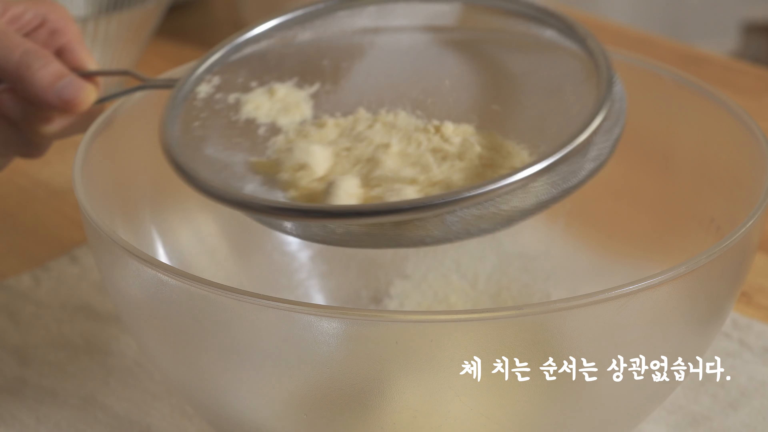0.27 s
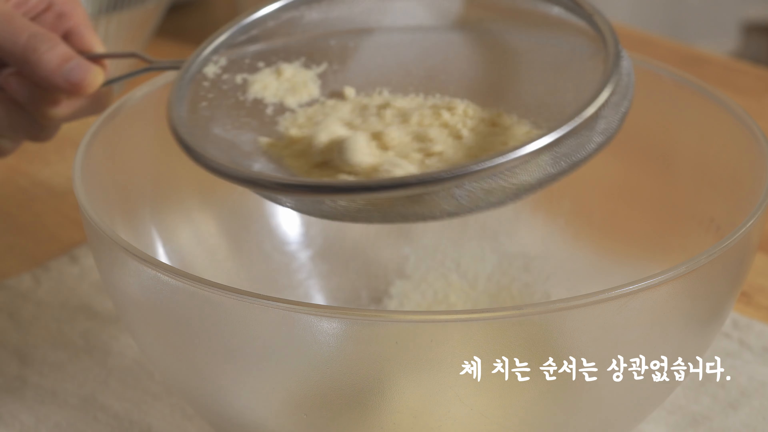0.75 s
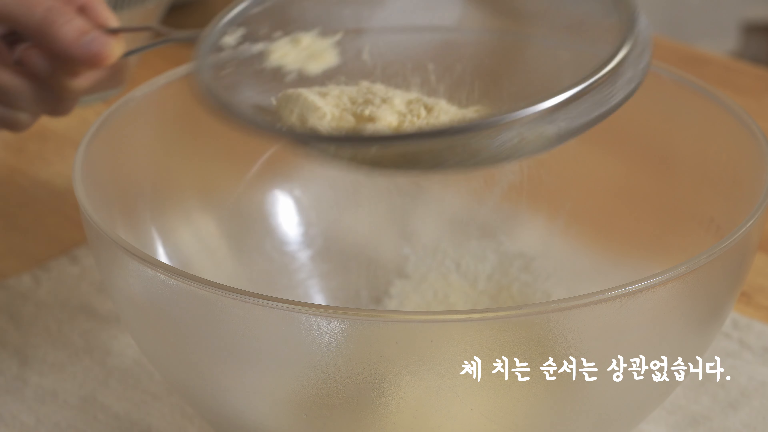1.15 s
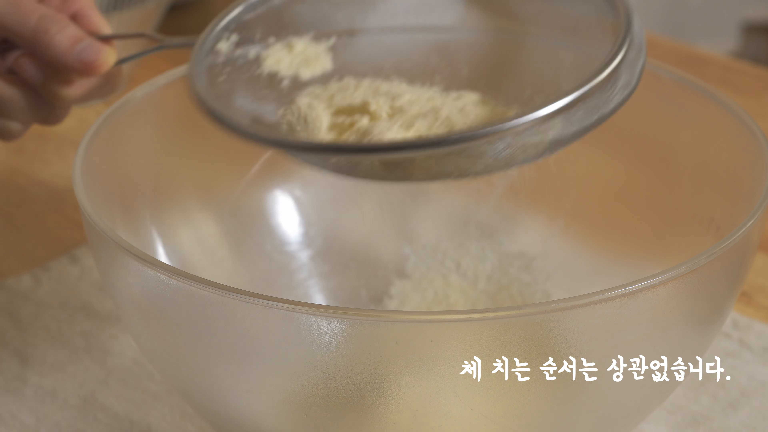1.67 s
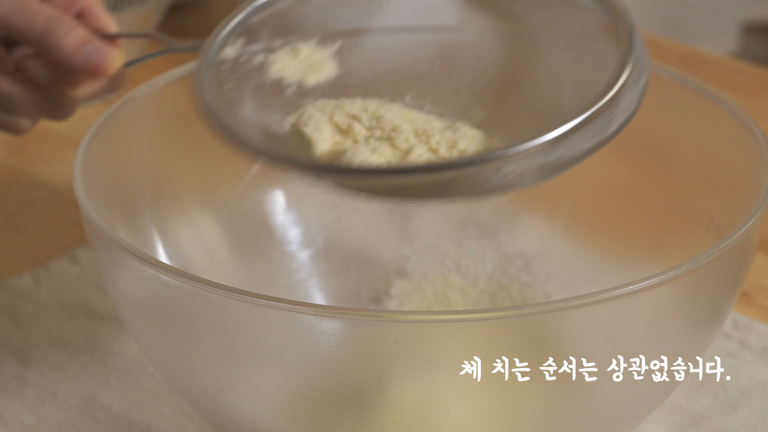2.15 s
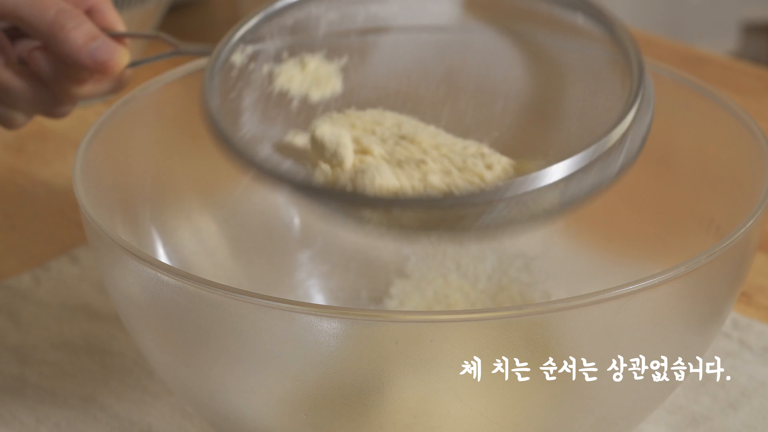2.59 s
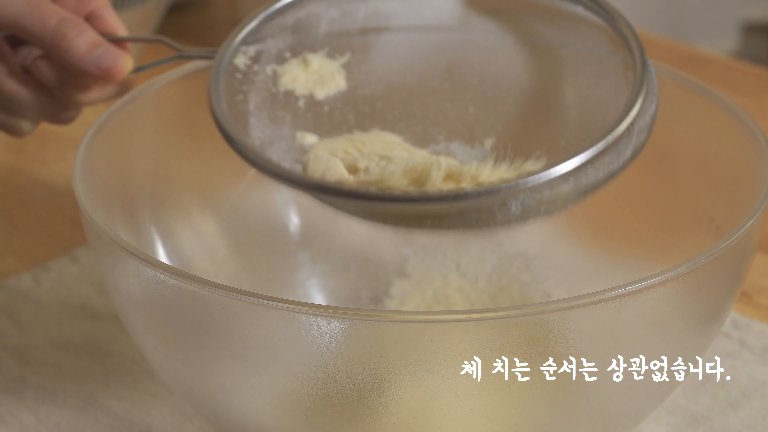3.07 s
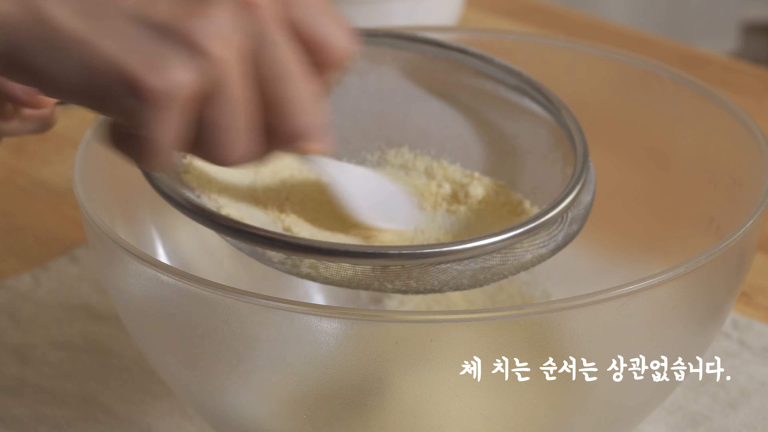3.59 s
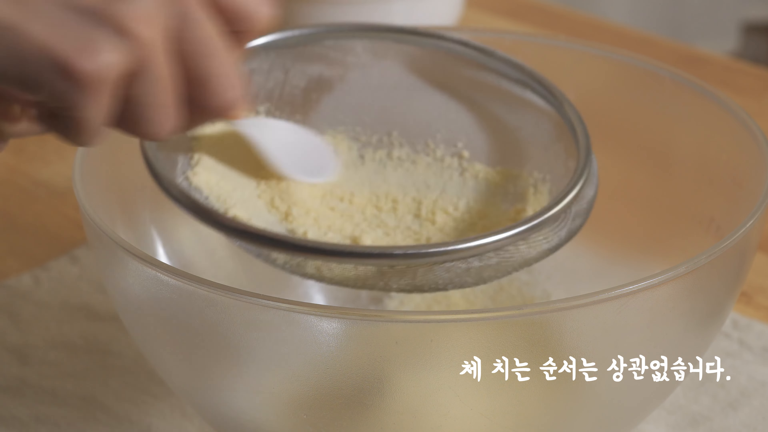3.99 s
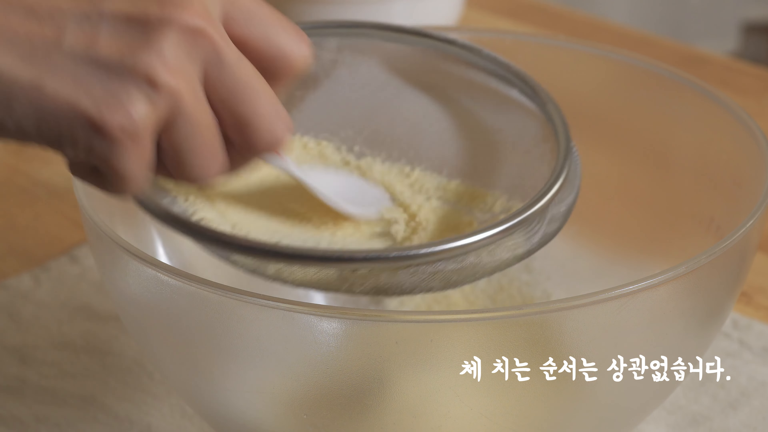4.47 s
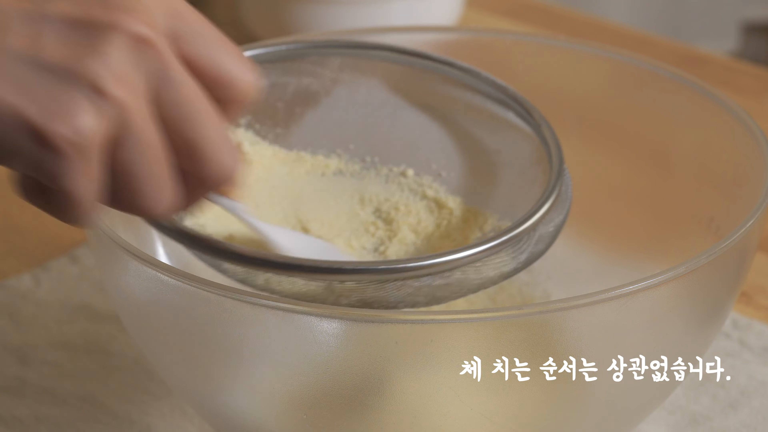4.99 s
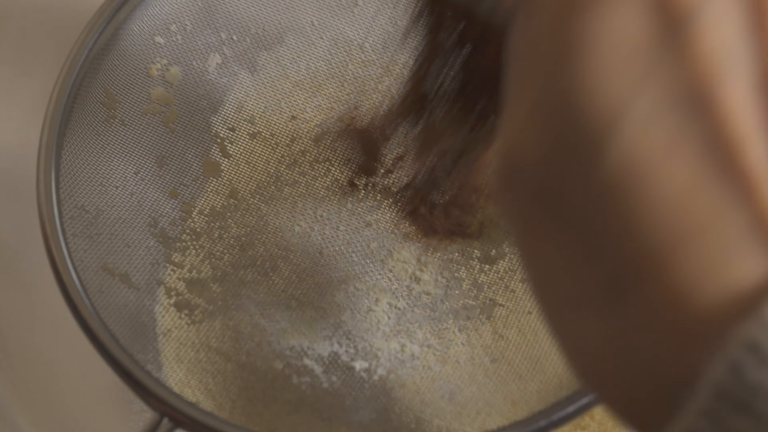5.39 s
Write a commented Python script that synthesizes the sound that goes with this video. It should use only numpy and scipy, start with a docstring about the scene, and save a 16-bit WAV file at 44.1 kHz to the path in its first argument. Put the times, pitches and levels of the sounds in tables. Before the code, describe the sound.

Flour hisses back and forth in a shaken wire sieve, then a spoon rubs it through with hollow scraping and a few knocks.

```python
"""A wire sieve of nut flour is shaken over a glass bowl: the heap hisses to and fro across the mesh and lumps
tick as they break on the wires. Then a spoon rubs the flour through: catching grains make the bowl's hollow
drone, the frame rasp and the table rumble, while fine grit hisses and now and then snaps. Soft pushes bump in
the hollow and knocks ring the frame. A quiet kitchen with an appliance hum lies below."""
import sys
import numpy as np
from scipy import signal
from scipy.fft import rfft, irfft, next_fast_len
from scipy.io import wavfile

SR = 44100
rng = np.random.default_rng(int(sys.argv[2]) if len(sys.argv) > 2 else 0)


def file_out(sig):
    """Save sig as 16-bit WAV at sys.argv[1]."""
    # one column per channel
    cols = np.atleast_2d(sig).T
    # limit, then scale
    lim = np.clip(cols, -1, 1)
    pcm = np.round(lim * 32767).astype(np.int16)
    wavfile.write(sys.argv[1], SR, pcm)


N = 248724
T = np.arange(N) / SR
SPOON_STARTS_S = 3.283   # shaking ends, rubbing begins

HEAP_SLIDES = [(.014, -64), (.056, -48.5), (.150, -53), (.206, -52.5), (.292, -55.5), (.351, -51.5),
               (.443, -54), (.504, -51), (.598, -53), (.675, -49), (.764, -56), (.849, -52), (.941, -57),
               (1.030, -51), (1.124, -57.5), (1.204, -50.5), (1.306, -55), (1.391, -50.5), (1.482, -55.5),
               (1.564, -50.5), (1.666, -55), (1.745, -51), (1.844, -56), (1.918, -51), (2.002, -55),
               (2.065, -50), (2.153, -53.5), (2.224, -49), (2.311, -54.5), (2.379, -53), (2.458, -58),
               (2.525, -51.5), (2.609, -55), (2.678, -50.5), (2.766, -53.5), (2.846, -50), (2.934, -55),
               (3.018, -51), (3.109, -56.5), (3.198, -50.5)]   # each slide at its fastest: t/s, level/dB
SWING_SHAPES = [(0.016, 0.02), (0.014, 0.027)]   # light swing, firm swing, timed to 4 dB below the top: rise/s, fall/s
HISS_EQ = [(880, -16.5), (1500, -12), (2390, -38), (2640, -9.5), (2860, -14), (3960, -10), (5020, -8.5),
           (6700, 2.5), (7200, 1), (7700, 2.5), (10200, 4.5), (12700, -2), (16000, -3)]   # flour on wire mesh: f/Hz, level/dB
def sliding_flour(trickle_db=-61.5):
    """The heap hisses over the mesh in light and firm swings, stopping short as the hand turns."""
    power = np.full(N, amp(trickle_db) ** 2)   # flour keeps falling between slides
    for k, (s, db) in enumerate(HEAP_SLIDES):
        rise_s, fall_s = SWING_SHAPES[k % 2]
        near = slice(max(int((s - .12) * SR), 0), int((s + .12) * SR))
        late = T[near] - s
        slowing = np.where(late < 0, np.abs(late / rise_s) ** 1.65, np.abs(late / fall_s) ** 3.5)
        power[near] += amp(db - 4 * slowing) ** 2
    dust = grains(per_s=15000, spread_db=1.2, shared=.65)
    return (T < SPOON_STARTS_S) * np.sqrt(power) * flutter(60, 1.0) * colour(dust, HISS_EQ)


FLOUR_TICKS = [(.009, -33, 1.5), (.0868, -50, 4), (0.1595, -40.5, 2), (0.215, -39.5, 5), (0.3164, -41, 1.5),
               (0.3264, -45, -7), (0.3908, -47.5, 5), (0.4615, -41.5, 4), (.4717, -42, -9),
               (0.5405, -48.5, 3), (0.6245, -45, 2), (0.63, -42, -4), (.706, -48.5, 4), (0.796, -43.5, 3),
               (0.855, -45, 2.5), (.9766, -46.5, 0.5), (.9942, -45.5, -4), (1.158, -42.5, 0.5),
               (1.1688, -48, -8), (1.3907, -41.5, 2), (1.5078, -39.5, 3), (1.5255, -45.5, -10),
               (1.6933, -40, 0.5), (1.706, -43, -4), (1.773, -53, 8), (1.8186, -59, 14.5), (1.8695, -41, 3),
               (1.881, -40, -3), (1.9518, -50.5, 7), (2.0216, -40, 3), (2.03, -42.5, -4),
               (2.1, -48.5, 10.5), (2.1321, -56.5, 15.5), (2.179, -33.5, 1), (2.2559, -49.5, 6),
               (2.329, -41, 2.5), (2.3852, -39.5, 4), (2.485, -39, 1), (2.4955, -46, -3), (2.5592, -49, 3),
               (2.631, -42, 4), (2.641, -40.5, -3), (2.7098, -51.5, 0), (2.7939, -43.5, 1.5),
               (2.799, -41, -3), (2.834, -49, 2), (2.8745, -47.5, 3), (2.9642, -40, 0), (3.0236, -46.5, -1),
               (3.1445, -48, 2.5), (3.163, -46.5, -10), (3.72, -46.5, -1), (3.8512, -51.5, -1),
               (4.581, -61.5, 14), (4.73, -64, -5), (4.971, -42, -13), (5.265, -50, -15),
               (5.29, -49.5, -10), (5.525, -61, 3)]   # ticks: lumps breaking on the mesh while shaking, then grit snapping under the spoon from 3.7 s: t/s, level/dB, brightness/dB
TICK_DULL = [(3330, 6100, -12), (5000, 1500, -3), (6650, 1000, 4), (7560, 2330, 2)]   # mesh resonances, body of a tick: f/Hz, width/Hz, level/dB
TICK_BRIGHT = [(9780, 5400, 35), (15100, 2300, -29)]   # top end of a tick: f/Hz, width/Hz, level/dB
def flour_ticks():
    """A lump crumbling on the wires, or a grain of grit snapping under the spoon, sounds for about 4 ms, then
    dies away; its top end goes first."""
    dull, bright, age = np.zeros(N), np.zeros(N), np.arange(900) / SR
    for s, db, bright_db in FLOUR_TICKS:
        i = int(s * SR)
        dull[i:i + 900] += amp(db - 1200 * age - 60 * np.maximum(age - .0035, 0) / .0095)
        bright[i:i + 900] += amp(db + bright_db - 1900 * age - 60 * np.maximum(age - .0025, 0) / .0047)
    crumbs = grains(14000, 1.5, .65)
    ticks = dull * unit(body(crumbs, TICK_DULL)) + bright * unit(body(crumbs, TICK_BRIGHT))
    return butter(ticks, 2, 2800, "high") * pan(-1)


# spoon strokes: t/s, hold/s, fade before pace/(dB/s), drone/dB, grit/dB, rasp/dB
SPOON_STROKES = [(3.286, 0.0044, 300, -48.5, -66, -79), (3.467, .004, 166, -48, -54.5, -58),
                 (3.75, 0.12, 126, -45, -58, -51.5), (4.048, 0.032, 159, -49.5, -54, -54.5),
                 (4.33, 0.1, 248, -46.5, -57.5, -60), (4.598, 0.13, 220, -43, -59.5, -54.5),
                 (4.79, 0.16, 100, -53, -66.5, -59.5), (4.973, 0.0056, 337, -34, -46.5, -42),
                 (5.02, 0.036, 106, -50, -60, -54.5), (5.252, 0.052, 356, -40.5, -56, -50.5),
                 (5.527, 0.077, 200, -52.5, -71, -60)]
def spoon_pressure(rise_db_per_s=396):
    """Each stroke digs in, holds and fades; gives envelopes for drone, grit and rasp."""
    resting_db, pace = (-57.5, -83, -65.5), (1.14, 1.18, .98)   # per layer; pace scales rise and fade
    t = T[T >= SPOON_STARTS_S]
    power = amp(resting_db)[:, None] ** 2
    for s, hold_s, fade, *tops_db in SPOON_STROKES:
        below_db = rise_db_per_s * np.maximum(s - t, 0) + fade * np.maximum(t - s - hold_s, 0)
        layers_db = np.array(tops_db)[:, None] - np.outer(pace, np.minimum(below_db, 90))
        power = power + amp(layers_db) ** 2
    return np.pad(np.sqrt(power), ((0, 0), (N - len(t), 0)))


BOWL_HOLLOW = [(296, 174, -15.5), (508.5, 90, -4.5), (568, 61.5, -1), (685, 75, -5), (880, 160, -12)]   # air resonances in the bowl: f/Hz, width/Hz, level/dB
FRAME_RASP = [(1124, 130, 3), (1362, 71, 6.5), (1463, 250, 0.5), (1963, 150, -1.5), (2060, 150, -8),
              (2252, 110, -0.5), (2730, 420, -8.5)]   # resonances of the scraped frame: f/Hz, width/Hz, level/dB
GRIT_EQ = [(1650, -38), (2800, -6), (3480, -11), (3750, -4), (4090, -7), (5020, -0.5), (5440, -6.5),
           (6670, -3), (9330, -2), (11800, -10), (14100, -6), (16000, -48)]   # hiss of the finest grains: f/Hz, level/dB
WIRE_RING = [(5200, 250, -7.5), (6320, 770, 7), (7400, 540, -13), (9400, 110, 8.5), (10460, 430, -2.5)]   # grit ringing in the mesh: f/Hz, width/Hz, level/dB
RUMBLE_EQ = [(15, -58), (25, -17), (49, 8.5), (107, -6.5), (135, -4), (168, -4.5), (257, -9.5), (300, -17),
             (390, -16), (660, -120)]   # low end of the table: f/Hz, level/dB
RUMBLE_ENVELOPE = [(3.283, -54), (3.44, -59), (3.71, -54.5), (3.745, -37), (3.92, -46.5), (4.01, -51),
                   (4.05, -39.5), (4.23, -51.5), (4.29, -44.5), (4.47, -50.5), (4.59, -43.5), (4.73, -49.5),
                   (4.79, -37.5), (4.87, -44.5), (5.0, -40), (5.2, -47), (5.29, -45), (5.48, -55),
                   (5.55, -42.5), (5.64, -43)]   # how hard the table shakes: t/s, level/dB
def spoon_rubbing():
    """Grains catch under the spoon and drive hollow, frame and table; the finest ones hiss."""
    drone_gain, grit_gain, rasp_gain = spoon_pressure()
    rumble_gain = amp(np.interp(T, *np.transpose(RUMBLE_ENVELOPE))) * (T >= SPOON_STARTS_S)
    catches = grains(1200, .74, .88) * flutter(28, .78)
    drone = drone_gain * unit(body(butter(catches, 2, 900), BOWL_HOLLOW))
    fine = colour(grains(9000, 2.7, .82), GRIT_EQ)
    fine = unit(fine + amp(1) * body(fine, WIRE_RING))
    table = butter(colour(grains(2000, 1.6, .1), RUMBLE_EQ), 4, 58, "high")
    table = unit(table + amp(-1) * resonate(table, 128.6, 23))   # the bowl rocks on its cloth
    rasp = rasp_gain * flutter(32, .97) * unit(body(grains(2500, 3.0, .74), FRAME_RASP))
    grit = grit_gain * flutter(29, 2.0) * fine
    rumble = rumble_gain * flutter(20.3, 2.17) * table
    return drone + rasp + grit + rumble


HOLLOW_BUMPS = [(3.285, -46, 483), (3.454, -43, 565), (3.469, -44, 710), (3.758, -32.5, 530),
                (3.78, -29.5, 558), (3.833, -32, 636), (3.84, -29.5, 596), (3.846, -28.5, 694),
                (3.867, -36, 513), (3.991, -37.5, 580), (4.063, -34, 630), (4.133, -35, 644),
                (4.302, -37, 553), (4.326, -38, 690), (4.333, -34.5, 550), (4.415, -42, 520),
                (4.582, -35, 553), (4.641, -39, 433), (4.664, -39, 594), (4.718, -39, 610),
                (4.774, -36, 654), (4.795, -35, 540), (4.935, -33, 650), (4.941, -40, 580),
                (4.962, -29, 488), (4.985, -26.5, 620), (4.992, -31.5, 650), (5.027, -36, 580),
                (5.097, -40, 622), (5.247, -35, 580), (5.309, -31, 640), (5.582, -28.5, 604)]   # soft bumps in the bowl: t/s, level/dB, f/Hz
def bowl_bumps(swell_s=.0025, faint_count=24, faint_db=-50, faint_hz=(490, 680)):
    """A soft push swells in the hollow for a cycle or two and fades; fainter ones fall at random."""
    when, size, pitch = rng.random((faint_count, 3)).T
    faint = zip(np.interp(when, [0, 1], [SPOON_STARTS_S, N / SR]),
                faint_db + 8 * (size - .5),
                np.interp(pitch, [0, 1], faint_hz))
    out, age = np.zeros(N + 2000), np.arange(2000) / SR
    envelope = age / swell_s * np.exp(1 - age / swell_s)
    for s, db, hz in [*HOLLOW_BUMPS, *faint]:
        i = int(s * SR)
        out[i:i + 2000] += amp(db) * envelope * np.sin(2 * np.pi * hz * age)
    return out[:N]


# blows on the frame: t/s, level/dB, contact low-pass/Hz, trim below 1 kHz/dB, share of the ring time
FRAME_BLOWS = [(.2793, -40.5, 6000, -18, 0.31), (.8775, -40.5, 6000, -22, .12),
               (2.4475, -39.5, 6000, -13, 0.33), (3.049, -40.5, 6000, -20, 0.14),
               (3.7200, -10, 4450, 0.5, 0.75), (4.0237, -18.5, 2240, 1.5, 0.57),
               (4.268, -28, 1690, 6, 0.88)]
FRAME_MODES = [(70.4, -31, .12, -9), (130.7, -9.5, 0.13, 3.5), (188, -17.5, 0.14, -1),
               (589, -10.5, 0.047, 1.5), (707, -14.5, 0.029, -1), (1156, -29, 0.079, -2),
               (1390, -32, 0.089, 11), (1560, -27, 0.033, -6), (1634, -14, 0.033, -6),
               (1824, -34.5, 0.21, 4), (2010, -15.5, 0.075, -3.5), (1885, -30, 0.21, 2),
               (2210, -25.5, 0.17, -7), (2130, -11, 0.012, -1), (2330, -36, 0.27, -5),
               (2726, -30, 0.14, -2), (2770, -41, 0.18, -5), (3430, -37, 0.054, -2), (3470, -38, 0.04, -14),
               (4400, -35, 0.066, 4), (4600, -26.5, 0.023, -4), (5600, -25, 0.024, -2)]   # sieve frame and bowl: f/Hz, level/dB, full t60/s, left minus right/dB
def frame_knocks():
    """Each blow rings all modes of the frame; a softer contact leaves out the high ones."""
    out, age = np.zeros((2, N + 10000)), np.arange(10000) / SR
    hz, db, t60, pan_db = np.transpose(FRAME_MODES)[:, :, None]
    thud, clack = hz < 300, hz > 1000
    side = np.array([.5, -.5])[:, None, None]
    phase = 1.2 * thud * side   # the thud comes through the table, unlike on each side
    # flour cushions the blow before the hard clack; the table answers last
    since = np.maximum(age - .0008 * clack - .001 * thud, 0)
    attack = np.minimum(since / np.where(thud, .003, .00025), 1)
    polarity = np.where(clack, 1, -1)   # the push dents first, the clack springs back
    tones = polarity * attack * np.sin(2 * np.pi * hz * since + phase)
    for s, blow_db, contact_hz, low_db, ring in FRAME_BLOWS:
        strength = amp(blow_db + db + low_db * (hz < 1000) + rng.normal(0, 1, hz.shape))
        modes = strength * amp(pan_db * side - 60 * since / (t60 * ring)) * tones
        i = int(s * SR)
        out[:, i:i + 10000] += butter(modes.sum(axis=1), 4, contact_hz)
    return out[:, :N]


APPLIANCE_HUM = [(59.2, -67.5), (118.4, -78.5), (279.9, -76.5), (360.7, -77.5), (468.3, -84.5)]   # hum partials: f/Hz, level/dB
ROOM_EQ = [(20, -3.5), (40, -18.5), (90, -14), (300, -15), (450, -19.5), (1000, -23.5), (2500, -26.5),
           (6000, -25), (16000, -27)]   # room tone: f/Hz, level/dB
def kitchen(air_db=-63):
    """Room air and an appliance hum whose higher partials waver faster."""
    hum = 0
    for hz, db in APPLIANCE_HUM:
        waver = flutter(rate_hz=hz / 20, depth_db=min(hz / 45, 4.0))
        hum = hum + amp(db) * waver * np.sin(2 * np.pi * hz * T + [[0], [.7]])   # phase offset for width
    return hum + amp(air_db) * colour(grains(SR, 0, .48), ROOM_EQ)


def grains(per_s, spread_db, shared):
    """Random stereo clicks of uneven size, partly shared by both sides; the left lags one sample."""
    born = rng.random((3, N)) < per_s / SR
    clicks = born * rng.standard_normal((3, N))
    clicks *= amp(spread_db * np.minimum(rng.exponential(1, (3, N)), 4))
    pair = np.sqrt(shared) * clicks[0] + np.sqrt(1 - shared) * clicks[1:]
    pair[0] = np.roll(pair[0], 1)
    return pair


def flutter(rate_hz, depth_db):
    """Random gain that wanders at about rate_hz."""
    slow = butter(rng.standard_normal(N + SR), 2, rate_hz)[SR:]
    return amp(depth_db * unit(slow))


def colour(x, eq):
    """Shape noise by an EQ curve (f/Hz, level/dB); rms 1."""
    hz, db = np.transpose(eq)
    size = next_fast_len(N)
    grid = np.log(np.arange(size // 2 + 1) * SR / size + 1)
    gain = amp(np.interp(grid, np.log(hz + 1), db))
    return unit(irfft(rfft(x, size) * gain, size)[..., :N])


def resonate(x, hz, width_hz):
    """One resonance, unity gain at its peak."""
    r = np.exp(-np.pi * width_hz / SR)
    poles = [1, -2 * r * np.cos(2 * np.pi * hz / SR), r * r]
    return signal.lfilter([(1 - r * r) / 2, 0, (r * r - 1) / 2], poles, x + 1e-18)


def body(x, modes):
    """Parallel resonances, polarity alternating."""
    return sum((-1) ** k * amp(db) * resonate(x, hz, width) for k, (hz, width, db) in enumerate(modes))


def butter(x, order, hz, kind="low"):
    """Low-pass or high-pass filter."""
    return signal.sosfilt(signal.butter(order, hz, kind, fs=SR, output="sos"), x)


def amp(db):
    """dB to gain."""
    return 10 ** (np.asarray(db) / 20)


def pan(db):
    """Stereo gains, left louder than right by db."""
    return amp([[db / 2], [-db / 2]])


def unit(x):
    """Scale to rms 1."""
    return x / np.sqrt(np.mean(x ** 2) + 1e-30)


def scene():
    """Sieve and spoon over the kitchen bed."""
    sieve = sliding_flour() + flour_ticks()
    spoon = (spoon_rubbing() + bowl_bumps()) * pan(-.45)
    return sieve + spoon + frame_knocks() + kitchen()


LEVEL_DIPS = [(0.892, 0.0054, -7), (1.974, 0.0054, -8.5), (3.271, 0.0073, -17.5)]   # brief dips in the whole mix: t/s, half length/s, level/dB
def record(dry):
    """The level dips briefly three times; the top is cut at 16 kHz."""
    dips_db = sum(db * np.exp(-((T - s) / half) ** 4) for s, half, db in LEVEL_DIPS)
    high_cut = signal.cheby2(20, 60, 16000, fs=SR, output="sos")
    return signal.sosfilt(high_cut, dry * amp(dips_db))


dry = scene()
out = record(dry)
file_out(out)
```